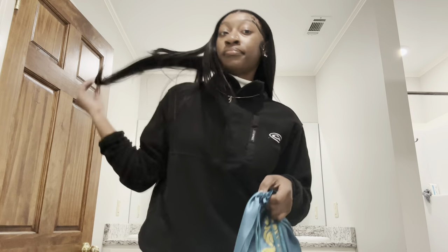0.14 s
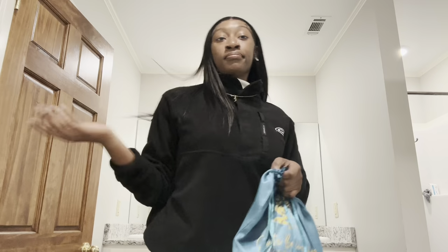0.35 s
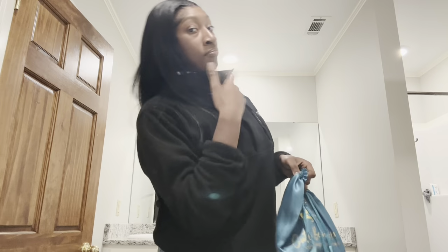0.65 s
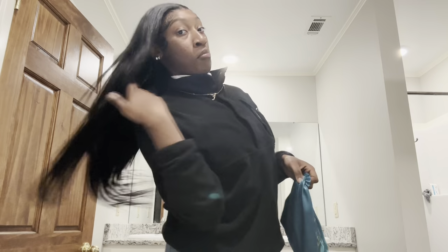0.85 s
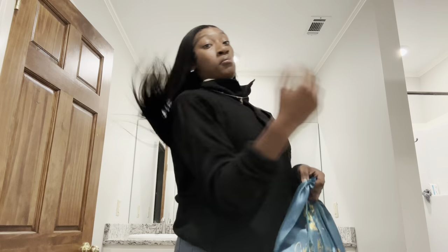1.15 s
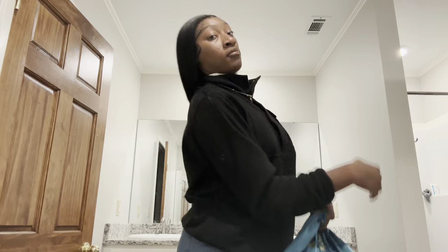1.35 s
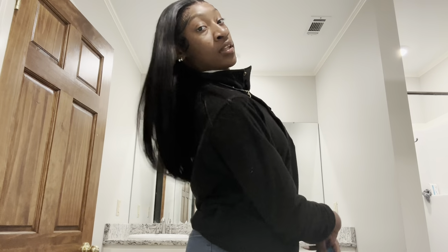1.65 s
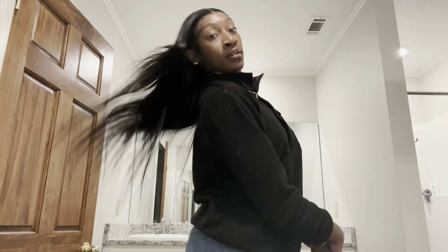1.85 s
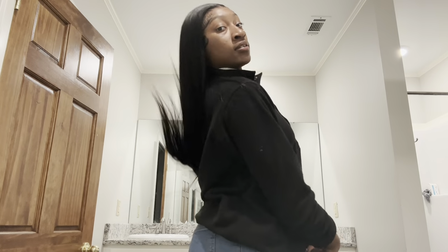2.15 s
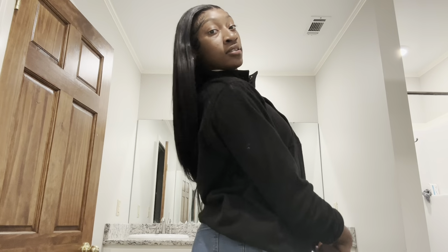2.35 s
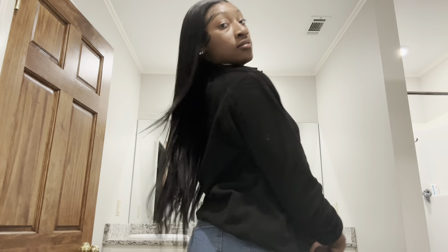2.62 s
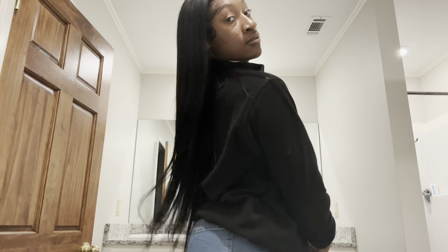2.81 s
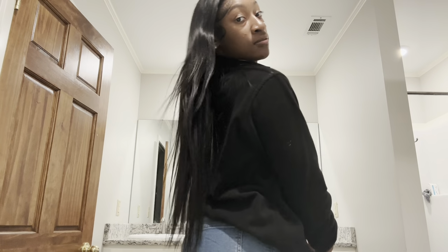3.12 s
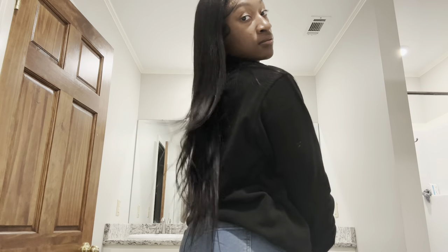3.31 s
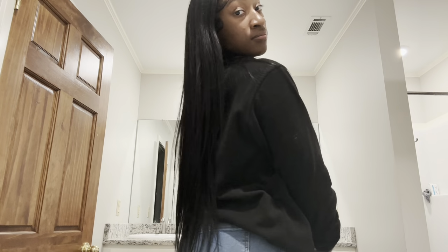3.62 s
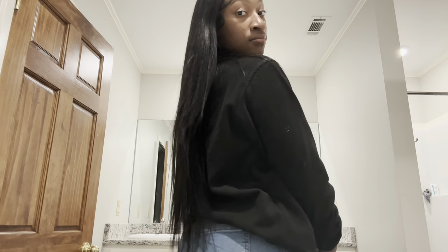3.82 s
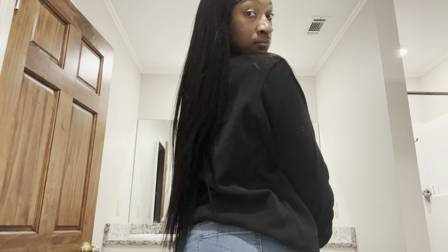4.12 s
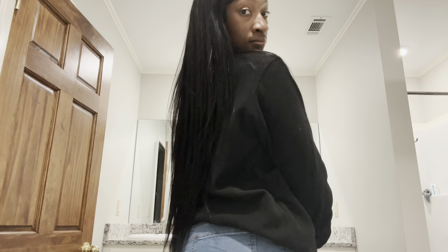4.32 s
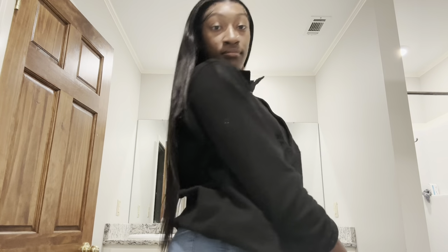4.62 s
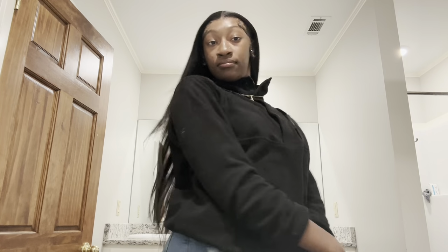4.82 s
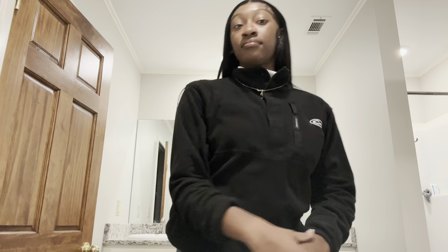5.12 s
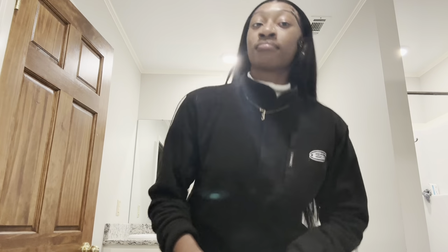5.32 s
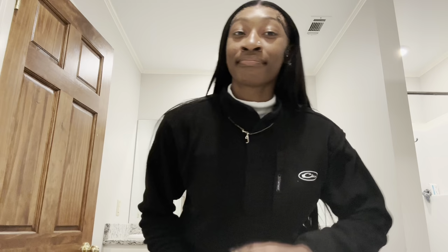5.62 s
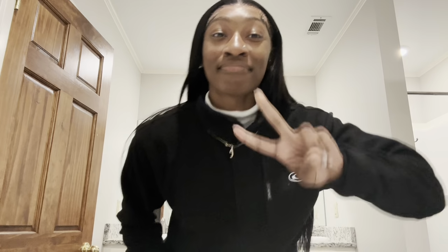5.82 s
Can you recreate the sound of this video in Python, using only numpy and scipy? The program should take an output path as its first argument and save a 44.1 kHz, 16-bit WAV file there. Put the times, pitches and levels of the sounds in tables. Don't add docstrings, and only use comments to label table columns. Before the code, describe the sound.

A ventilation fan hums low and steadily in a small, hard-surfaced bathroom, with a slight rapid throb and soft airy hiss. Near the stereo microphone, long hair flicks over a fleece top in quick faint swishes for about three seconds; then sleeves and body rub inside the fleece, most clearly just after five seconds. Two faint low air puffs accompany arm sweeps.

```python
import sys
import numpy as np
from scipy import signal
from scipy.fft import rfft, irfft, next_fast_len
from scipy.io import wavfile
from scipy.ndimage import uniform_filter1d, map_coordinates

SR = 44100
rng = np.random.default_rng(int(sys.argv[2]) if len(sys.argv) > 2 else 0)


def amplitude_ratio(level_db):
    exponent = np.asarray(level_db, float) / 20
    return 10 ** exponent


def file_out(sig):
    cols = np.atleast_2d(sig).T
    lim = np.clip(cols, -1, 1)
    pcm = np.round(lim * 32767).astype(np.int16)
    wavfile.write(sys.argv[1], SR, pcm)


N = 262659
FFT_LEN = next_fast_len(N + SR // 2)
BIN_HZ = np.fft.rfftfreq(FFT_LEN, 1 / SR)

HUM_HZ, SHAFT_HZ = 119.965, 15.99
# left_db, right_db, left_lead_rad
HUM_MULTIPLES = [(-26.4, -26.1, 0), (-48.7, -44.1, -.4), (-58.6, -59.4, -1.4), (-75, -61.7, -1),
                 (-59, -61, -1.4), (-73, -66, 2.2)]
THROB_TURNS = [-1, 1, 3]
# left_db, right_db, left_lead_rad
THROB_SIDEBANDS = [(-50, -52, -.1), (-50, -47, .3), (-66, -54, 1.3)]
DRIFTING_HZ = [
    395.6,
    576.0,
    9480.0,
    9720.0,
]
# left_db, right_db, left_lead_rad, phase_drift_rad
DRIFTING_TONES = [(-48, -49.5, 1.7, 0.081), (-56, -58, 1.5, 1.8), (-90.5, -99.5, 0, .1),
                  (-90.5, -97, -.4, .1)]
# pitch_hz, width_hz, level_db_per_hz
DEEP_MODES = [(30, 7.2, -70.5), (44.5, 8.7, -65.5), (59.5, 12, -55.5), (69.4, 11, -53.5), (81.9, 13, -57.5),
              (98.8, 9.3, -59.5)]
# pitch_hz, width_hz, left_db_per_hz, right_db_per_hz, left_lead_rad
ROOM_MODES = [(126.2, 13, -51.5, -54.5, 0.64), (144, 8.9, -52.5, -51.5, 0), (167.8, 23, -68, -59.5, 1.5),
              (195.1, 10, -71, -63, 0.4), (228.8, 12.5, -58, -54.5, -0.8), (249.2, 9.8, -55, -55, -1),
              (265.1, 15, -61, -57.5, 0.65), (292.4, 26, -69, -62.5, 1), (326.4, 13, -63, -61, -0.6),
              (355.6, 12, -58.5, -70, 2.5), (370.8, 23, -67.5, -70.5, .5), (533, 22, -102, -97.5, 0),
              (574.2, 16, -67.5, -71, 2), (623.4, 57, -67.5, -74, 1.97), (715, 25, -70.5, -72, -4),
              (767.3, 13, -72.5, -68.5, -1), (839, 6.3, -74, -78, 1), (906, 31, -79.5, -72, 1),
              (1274, 49, -91.5, -80.5, 3)]
# freq_hz, t60_s
WALL_DECAY = [(300, 0.44), (2000, 0.36), (10000, 0.14)]
# freq_hz, level_db_per_hz
AIR_SPECTRUM = [(250, -9.5), (420, 0.5), (600, -2), (800, -0.5), (930, -8.5), (1000, -8.5), (1320, -10),
                (1480, -14.5), (2100, -22), (2900, -31.5), (4200, -29.5), (5500, -40), (9100, -44.5),
                (11500, -80)]
# freq_hz, level_db_per_hz
DRAUGHT_SPECTRUM = [(25, -30), (50, -3), (95, -1), (125, 1), (190, -7), (260, -5), (400, -25), (600, -120)]
# freq_hz, level_db_per_hz
PORT_HISS_SPECTRUM = [(8000, -60), (8900, -12), (9600, 0), (10500, -9), (11500, -19), (13500, -17),
                      (15500, -24), (16500, -40)]
# freq_hz, share_0_to_1
PORT_SHARE = [(900, 0), (1500, .45), (2800, .5), (3300, .2), (4500, .3), (5100, .1), (6800, .4),
              (7500, .15), (8800, .6), (9900, 1)]
# freq_hz, left_lead_half_turns
PORT_LEAD = [(1400, -1), (3000, 1), (3500, 1.85), (4400, 1.15), (5200, 1.7), (7200, 2.95), (7700, 2.1),
             (9000, 1.6), (10350, 1), (12300, 0), (14500, -1), (16600, -2)]
# freq_hz, left_minus_right_db
PORT_LEAN = [(300, -10), (560, -1.5), (970, 2), (1700, -4), (2600, -5), (3800, 0.5), (5200, -4.5),
             (7000, -6.5), (9400, -1.5), (10000, -2.5)]
# start_s, hold_s, stroke_db, body_db,
# sheen_db
CLOTH_STROKES = [(0.048, .03, -74.5, 2, 0), (0.396, .05, -62.5, -5, 1.5), (0.47, .025, -63, 1.5, -2),
                 (.585, 0.013, -68.5, 6.5, -8.5), (0.686, 0.033, -65, -1.5, 0.5), (.75, .07, -62.5, -2, 1),
                 (0.847, 0.034, -57, -1, -1), (.92, .01, -62.5, 1, -4), (0.997, .1, -71, 7, -2.5),
                 (1.239, .11, -75.5, 5, 0.5), (1.399, 0.0099, -58.5, 1.5, -5.5), (1.59, .03, -62, 5.5, 6),
                 (1.685, 0.034, -63, 1, -0.5), (1.842, .012, -56, 0, -5), (1.913, 0.0081, -66, 3.5, 1),
                 (2.081, 0.067, -70, 8, -2.5), (2.229, 0.022, -68, -3.5, -2), (2.423, .12, -81, 3, 0),
                 (2.74, .05, -80, 3, -1), (3.025, .04, -72, 1, -6.5), (3.158, .055, -66.5, -0.5, -8),
                 (3.371, .04, -74, 5, -0.5), (3.468, 0.11, -57, -2, -3.5), (3.639, 0.033, -72, 5, -2),
               (4.039, 0.068, -68, -1.5, -2.5), (4.409, 0.043, -70, 2, -4), (4.60, 0.096, -65.5, -0.5, -1),
               (4.721, 0.11, -61, -1, -1.5), (4.931, .25, -76, 3, 2), (5.27, 0.035, -62, 2.5, -1),
               (5.338, .025, -48, 0, -.5), (5.413, 0.081, -59.5, 2, -4.5), (5.561, 0.013, -55, 4.5, -1),
               (5.632, .02, -64.5, 0, -2.5), (5.738, .05, -70.5, 4, -1.5), (5.85, 0.062, -64.5, 5, -3)]
# freq_hz, level_db_per_hz
FIBRE_SPECTRUM = [(1200, -57), (2200, -25), (3000, -2), (4500, -0.5), (5500, -6.5), (7500, -22),
                  (10000, -60.5)]
# freq_hz, level_db_per_hz
FLEECE_SPECTRUM = [(250, -64.5), (450, -25), (750, 0.5), (1300, -0.5), (1900, -3), (2400, -4), (2900, -5),
                   (3800, -26), (6000, -59.5)]
# freq_hz, level_db_per_hz
SHEEN_SPECTRUM = [(3000, -49.5), (4500, -19.5), (6200, -1.5), (7500, -3), (9300, -6), (10500, -10.5),
                  (11600, -19), (13500, -23), (15500, -22.5), (17000, -40.5)]
# peak_s, level_db, length_s
ARM_PUFFS = [
    (.52, -46, .04),
    (1.46, -46, .04),
]
# freq_hz, level_db_per_hz
PUFF_SPECTRUM = [(20, -30), (45, 0), (100, -2), (180, -30), (300, -120)]


def unit(x):
    return x / np.sqrt(np.mean(x ** 2) + 1e-20)


def along(points, hz):
    point_hz, value = np.transpose(points)
    return np.interp(np.log(hz + 1), np.log(point_hz + 1), value)


def wobble(rate_hz):
    knots = rng.standard_normal(int(N * rate_hz / SR) + 4)
    return map_coordinates(knots, [np.arange(N) * rate_hz / SR])


def coloured(x, spectrum):
    shaped = rfft(x, FFT_LEN) * amplitude_ratio(along(spectrum, BIN_HZ))
    return unit(irfft(shaped, FFT_LEN)[..., :N])


def tone(hz, left_db, right_db, left_lead_rad, wander_rad):
    phase = 2 * np.pi * hz * np.arange(N) / SR + wander_rad
    port_phase = phase + [[left_lead_rad / 2], [-left_lead_rad / 2]]
    return np.sqrt(2) * amplitude_ratio([[left_db], [right_db]]) * np.sin(port_phase)


def hum_and_throb():
    mains_rad, shaft_rad = .04 * wobble(2), .3 * wobble(2)
    total = np.zeros((2, N))
    for k, row in enumerate(HUM_MULTIPLES):
        total += tone((k + 1) * HUM_HZ, *row, (k + 1) * mains_rad + k * k)
    for turns, row in zip(THROB_TURNS, THROB_SIDEBANDS):
        total += tone(HUM_HZ + turns * SHAFT_HZ, *row, mains_rad + turns * shaft_rad + .4)
    return total


def drifting_tones():
    total = np.zeros((2, N))
    for hz, (*row, drift_rad) in zip(DRIFTING_HZ, DRIFTING_TONES):
        total += tone(hz, *row, drift_rad * wobble(2)) * amplitude_ratio(1.6 * wobble(1.7))
    return total


def room_modes():
    f = BIN_HZ[BIN_HZ < 3000]
    total = np.zeros((2, len(BIN_HZ)), complex)
    deep = [(*row, row[-1], 0) for row in DEEP_MODES]
    for hz, width_hz, left_db, right_db, lead_rad in deep + ROOM_MODES:
        drive = rng.standard_normal(len(f)) + 1j * rng.standard_normal(len(f))
        damping = 1j * f * width_hz
        ring = (damping / (hz * hz - f * f + damping)) ** 1.66
        turn = np.exp([[.5j * lead_rad], [-.5j * lead_rad]])
        total[:, :len(f)] += amplitude_ratio([[left_db], [right_db]]) * turn * drive * ring
    return irfft(total * np.sqrt(FFT_LEN * SR / 4), FFT_LEN)[:, :N]


def walls(x):
    hz, t, z = signal.stft(rng.standard_normal((2, SR // 2)), SR, nperseg=256)
    decay_db = -60 * t / along(WALL_DECAY, hz)[:, None]
    tail = signal.istft(z * amplitude_ratio(decay_db), SR, nperseg=256)[1]
    return signal.fftconvolve(np.atleast_2d(x), tail / np.linalg.norm(tail[0]), axes=1)


def grille_hiss():
    fan = walls(rng.standard_normal(N + SR))[:, SR:SR + N]
    hiss = coloured(amplitude_ratio(-1.0) * fan + rng.standard_normal((2, N)), AIR_SPECTRUM)
    level_db = -45.5 + 1.5 + 0.64 * wobble(4.4)
    return amplitude_ratio(level_db) * hiss


def draught():
    return amplitude_ratio(-53) * coloured(rng.standard_normal((2, N)), DRAUGHT_SPECTRUM)


def port_hiss():
    return amplitude_ratio(-91.0) * coloured(rng.standard_normal((2, N)), PORT_HISS_SPECTRUM)


def ports(x):
    left, right = rfft(x + port_hiss(), FFT_LEN)
    share, lean_db = along(PORT_SHARE, BIN_HZ), along(PORT_LEAN, BIN_HZ) / 2
    turn = np.exp(-1j * np.pi * np.interp(BIN_HZ, *np.transpose(PORT_LEAD)))
    right = share * turn * left + np.sqrt(1 - share ** 2) * right
    return irfft(np.array([left, right]) * amplitude_ratio([lean_db, -lean_db]), FFT_LEN)[:, :N]


def strokes():
    rise_db_per_s, fall_db_per_s = 279, 172
    usual_db, snap_db_per_db = -62, .35
    rest_db, rest_body_db, rest_sheen_db = -79, 9.5, -3.5
    rest_pan_db, stroke_pan_db = -2, 0.5
    events = np.transpose(CLOTH_STROKES)[:, :, None]
    start_s, hold_s, stroke_db, body_db, sheen_db = events
    t = np.arange(0, N / SR + .01, .004)
    rise = rise_db_per_s * amplitude_ratio(snap_db_per_db * (stroke_db - usual_db))
    before_s = np.maximum(start_s - t, 0)
    after_s = np.maximum(t - start_s - abs(hold_s), 0)
    level_db = stroke_db - rise * before_s - fall_db_per_s * after_s

    def gain(over_db, rest_over_db):
        power = np.sum(amplitude_ratio(2 * (level_db + over_db)), axis=0)
        return np.sqrt(power + amplitude_ratio(2 * (rest_db + rest_over_db)))

    fibre, fleece, sheen = gain(0, 0), gain(body_db, rest_body_db), gain(sheen_db, rest_sheen_db)
    pan_db = stroke_pan_db + (rest_pan_db - stroke_pan_db) * amplitude_ratio(rest_db) / fibre
    return [np.interp(np.arange(N) / SR, t, curve) for curve in (fibre, fleece, sheen, pan_db)]


def slips(spectrum):
    clump_db = 0.75 * wobble(25) + 0.8 * wobble(200)
    return coloured(unit(rng.standard_normal((2, N)) * amplitude_ratio(clump_db)), spectrum)


def patchy(x, depth_db):
    z = signal.stft(x, nperseg=256)[2]
    field = uniform_filter1d(rng.standard_normal(z.shape[1:]), size=5, axis=0)
    field = uniform_filter1d(field, size=12, axis=1)
    return signal.istft(z * amplitude_ratio(depth_db * unit(field)), nperseg=256)[1][:, :N]


def rustle():
    fibre, fleece, sheen, pan_db = strokes()
    cloth = fibre * slips(FIBRE_SPECTRUM)
    cloth = cloth + amplitude_ratio(2) * fleece * slips(FLEECE_SPECTRUM)
    cloth = cloth + sheen * slips(SHEEN_SPECTRUM)
    cloth = amplitude_ratio(1.5) * patchy(cloth, depth_db=1.6)
    direct = cloth * amplitude_ratio([pan_db / 2 + 1.0, -pan_db / 2 - 0.64])
    return direct + amplitude_ratio(-9.0) * walls(cloth[0])[:, :N]


def puffs():
    t = np.arange(N) / SR
    swell = np.zeros(N)
    for peak_s, level_db, length_s in ARM_PUFFS:
        swell += amplitude_ratio(level_db) * np.exp(-((t - peak_s) / length_s) ** 2)
    return swell * coloured(rng.standard_normal((2, N)), PUFF_SPECTRUM)


def scene():
    motor = hum_and_throb() + drifting_tones()
    diffuse = grille_hiss() + draught() + rustle()
    return motor + room_modes() + ports(diffuse) + puffs()


def low_pass(x):
    return signal.sosfilt(signal.butter(12, 15750, fs=SR, output="sos"), x)


def record(dry):
    edge_s = .004
    ramp = np.clip(np.arange(N) / (edge_s * SR), 0, 1)
    return low_pass(dry * np.sin(np.pi / 2 * ramp) ** 2)


dry = scene()
out = record(dry)
file_out(out)
```